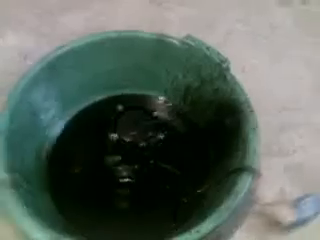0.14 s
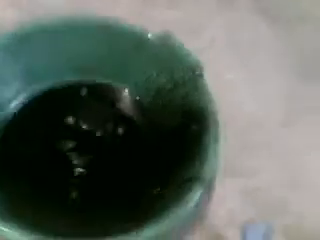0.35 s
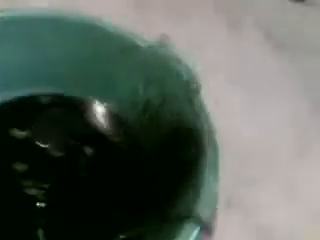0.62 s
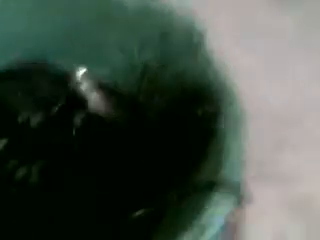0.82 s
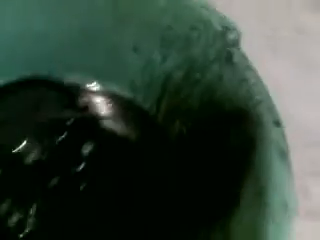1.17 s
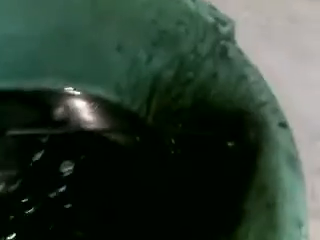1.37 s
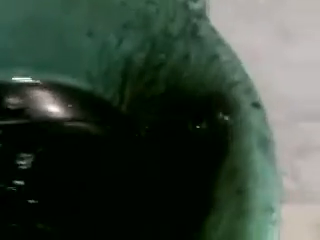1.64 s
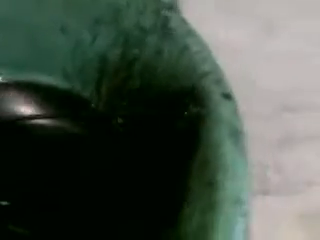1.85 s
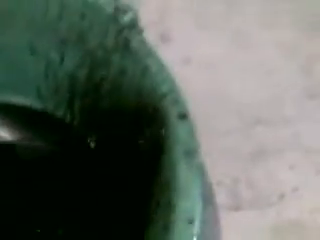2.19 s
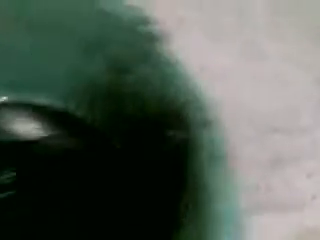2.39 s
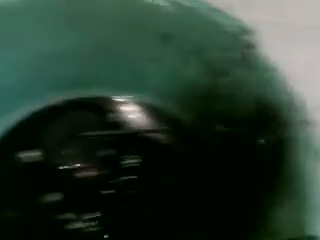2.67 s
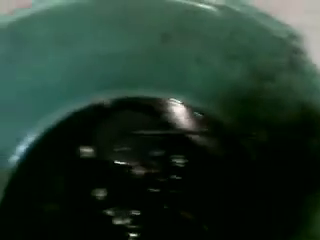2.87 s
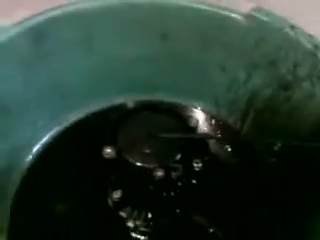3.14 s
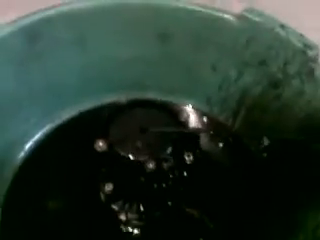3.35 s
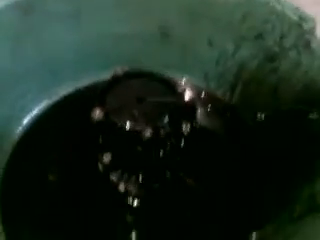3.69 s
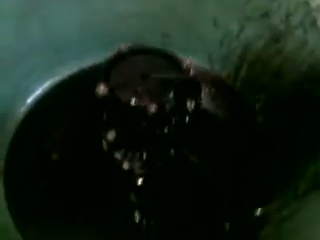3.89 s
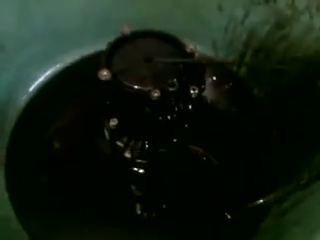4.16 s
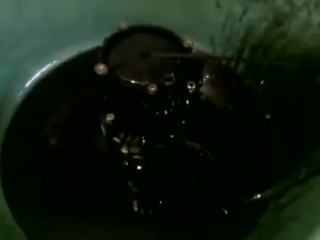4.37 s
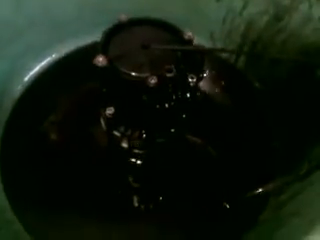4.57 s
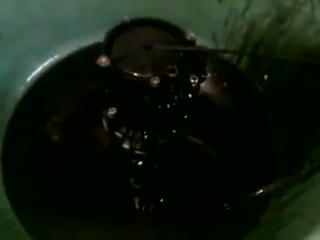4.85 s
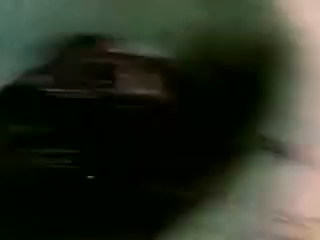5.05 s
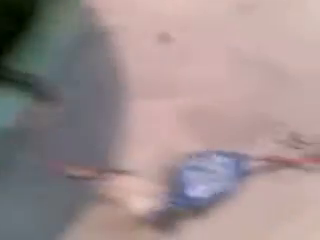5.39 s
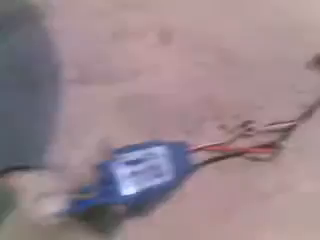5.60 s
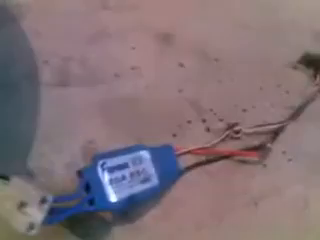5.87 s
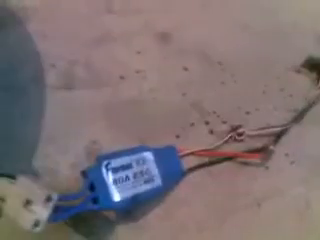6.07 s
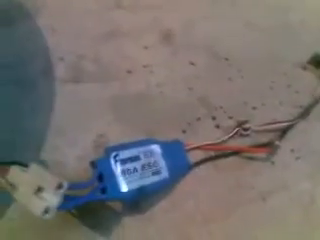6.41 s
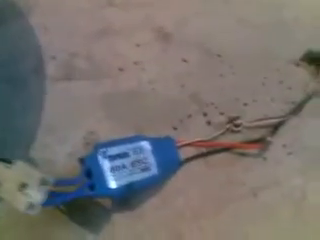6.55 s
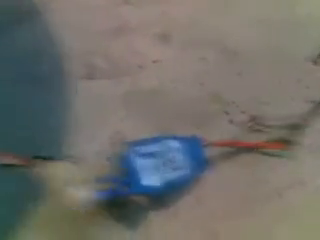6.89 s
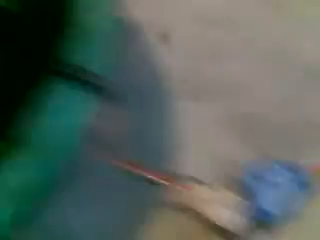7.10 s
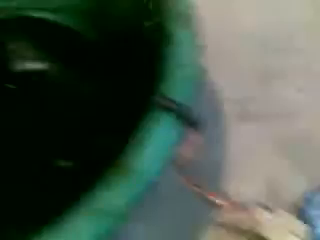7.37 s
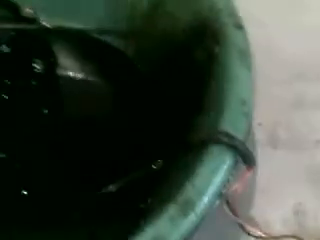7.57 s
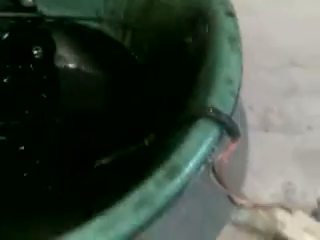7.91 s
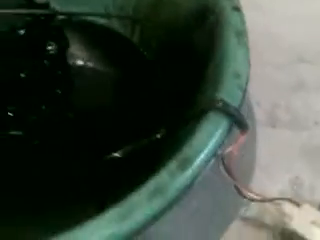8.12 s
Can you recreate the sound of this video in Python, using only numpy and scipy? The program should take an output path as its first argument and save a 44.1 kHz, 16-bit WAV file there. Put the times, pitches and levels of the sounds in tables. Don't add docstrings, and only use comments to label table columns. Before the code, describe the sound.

A small motor submerged in oil buzzes and rattles steadily in a plastic bucket, knocking the wall, with oil spatter and a faint high electronic whine.

```python
import sys
import numpy as np
from scipy import signal
from scipy.fft import rfft, irfft, next_fast_len
from scipy.io import wavfile
from scipy.ndimage import uniform_filter1d, map_coordinates

SR = 44100
rng = np.random.default_rng(int(sys.argv[2]) if len(sys.argv) > 2 else 0)


def voltage_ratio(level):
    return 10 ** (np.asarray(level, float) / 20)


def unload_audio(sound):
    columns = np.transpose(np.atleast_2d(sound))
    steps = np.round(np.clip(columns, -1, 1) * 32767)
    wavfile.write(sys.argv[1], SR, steps.astype(np.int16))


N = 363384

# (t/s, lead/turns)
SHAFT_LEAD = [(0, -.08), (1.4, -.33), (2.9, -.305), (3.7, -.32), (4.75, -.41), (5.5, -.36), (6.25, -.32),
              (6.9, -.18), (8.24, .02)]


def shaft():
    steady_hz = 31.2
    lead = uniform_filter1d(curves(SHAFT_LEAD)[0], size=8000)
    return steady_hz * np.arange(N) / SR + lead


# (angle/turns, length/turns, level/dB)
CONTACTS = [
    (.0, 0.035, -8),
    (0.43, 0.04, -8),
    (0.516, 0.025, -3),
    (0.63, 0.07, -6.5),
]


def rubbing(turns, contact, scatter_db, grit_db):
    force = np.ones(N)
    for angle, length, db in CONTACTS:
        turn = np.round(turns - angle)
        strengths = voltage_ratio(db + scatter_db * rng.standard_normal(N // 1000))
        size = strengths[turn.astype(int) + 2]
        force += contact * size * np.exp(-.5 * ((turns - angle - turn) / length) ** 2)
    return force * voltage_ratio(grit_db * wobble(700)) * rng.standard_normal(N)


# (t/s, peak level/dB)
THUDS = [(0.29, -22), (0.509, -11.5), (0.68, -15), (0.925, -14), (1.066, -15), (1.281, -13), (1.344, -9.5),
         (1.377, -10), (1.41, -16.5), (1.538, -19), (1.602, -10.5), (1.666, -13), (1.794, -10),
         (1.859, -12), (1.954, -11), (2.017, -15), (2.051, -12), (2.083, -11), (2.114, -8.5), (2.153, -15),
         (2.179, -15), (2.295, -17), (2.444, -13), (2.531, -8), (2.595, -13.5), (2.659, -19), (2.71, -20),
         (2.819, -12), (2.947, -14), (3.045, -21), (3.086, -38), (3.203, -11.5), (3.25, -15),
         (3.345, -11.5), (3.459, -27), (3.505, -13.5), (3.632, -10), (3.716, -12), (3.782, -12),
         (3.809, -14), (3.849, -9), (3.943, -12), (4.04, -12), (4.198, -15), (4.44, -13.5), (4.484, -14),
         (4.585, -17), (4.712, -33), (4.885, -11), (4.906, -10), (5.897, -23), (5.93, -17), (6.697, -22),
         (6.778, -15), (7.092, -17), (7.462, -25), (7.601, -17), (7.629, -10), (7.811, -19), (8.067, -16)]
# (t/s, peak level/dB)
MORE_THUDS = [(.195, -18), (.637, -14), (.728, -16), (1.697, -15), (1.914, -21), (2.309, -13), (2.385, -10),
              (2.754, -26), (2.789, -25), (2.99, -17), (3.568, -20), (4.155, -17), (4.759, -14), (4.983, -16),
              (5.037, -14), (5.189, -14), (5.529, -23), (5.675, -28), (6.316, -20), (6.95, -14.5), (7.715, -17),
              (2.415, -11), (2.49, -13), (6.535, -24), (6.635, -15)]


def lifted():
    lift_s, lift_db = 0.0054, -3.5
    press_s, press_db = .008, 2
    t = np.arange(N) / SR
    pushes = np.sort(np.transpose(THUDS + MORE_THUDS)[0])
    halfway = (pushes[1:] + pushes[:-1]) / 2
    nearest = np.clip(np.searchsorted(halfway, t), 0, len(pushes) - 1)
    since = t - pushes[nearest]
    lift = lift_db * np.exp(-.5 * (since / lift_s + 1) ** 2)
    press = press_db * np.exp(-.5 * (since / press_s - 1) ** 2)
    return voltage_ratio(lift + press)


# (f/Hz, width/Hz, level/dB)
WALL = [(713, 63, -3.5), (760.2, 120, 7.5), (953, 77, -7.5)]
RIM_LOW = [(1155, 264, 0.5), (1405, 50, -3.5)]
RIM_HIGH = [(1086, 650, -6), (1268, 138, 2.5)]
HOUSING = [(1639, 176, -0.58), (1770, 196, -0.42)]
BASE = [(402, 98, 0)]
# (far level/dB, over level/dB, beside level/dB, change per aim/dB)
WALL_DB = (-32.5, -31.5, -37, 1.3)
RIM_DB = (-35, -35, -34, 1.4)
HOUSING_DB = (-43, -43.5, -40.5, 2.5)
BASE_DB = (-49, -83, -62, 6)
RIM_HIGH_SHARE = (0.72, 0.31, 0.71, 0.21)


def bucket(turns):
    lift = lifted()
    wall_rub = rubbing(turns - .02, .8, 2.5, .8) * lift * voltage_ratio(0.5 * wobble(17))
    wall = voltage_ratio(heard(WALL_DB) + 0.48) * unit(rung(wall_rub, WALL))

    low_rim = unit(rung(rubbing(turns + .03, 0.9, 4, 2) * lift, RIM_LOW))
    high_rim = unit(rung(rubbing(turns + .03, 0.9, 4, 2) * lift, RIM_HIGH))
    high = np.clip(placed(*RIM_HIGH_SHARE) + 0.13 * wobble(4.5), 0, 1)
    rim = np.sqrt(1 - high) * low_rim + np.sqrt(high) * high_rim
    rim *= voltage_ratio(heard(RIM_DB) + 0.5)

    housing_rub = rubbing(turns + 0.018, 1.3, 3, 2.6)
    housing = voltage_ratio(heard(HOUSING_DB) - 1.5) * unit(rung(housing_rub, HOUSING))
    base = voltage_ratio(heard(BASE_DB)) * unit(rung(rubbing(turns, 0.48, 3, 2.3), BASE))
    pushes = blows(THUDS + MORE_THUDS, t60=0.024, tail=0.067)
    thuds = voltage_ratio(25.5) * rung(pushes, WALL + [(1185, 194, 0.5)])
    return wall + rim + housing + thuds + base


# (t/s, peak level/dB)
KNOCKS = [(0.825, -30.5), (0.8555, -36.5), (1.049, -39), (1.0824, -34), (1.147, -35), (1.3065, -34),
          (1.338, -38), (1.4346, -37), (1.531, -38), (1.5978, -55), (1.6906, -34), (1.729, -29),
          (1.7878, -43), (1.855, -34), (1.8741, -35), (1.9774, -30.5), (2.0797, -32), (2.144, -39),
          (2.1778, -27), (2.2056, -29), (2.2694, -31.5), (2.305, -34), (2.3231, -42), (2.4613, -37),
          (2.4907, -30), (2.556, -29.5), (2.589, -31), (3.9365, -36), (4.58, -35), (4.6743, -35),
          (5.027, -36), (5.378, -37), (5.476, -36), (5.5712, -38), (5.634, -30), (5.6685, -35), (5.7, -34),
          (5.829, -36), (5.8934, -35), (5.9545, -31), (6.0192, -33), (6.0831, -36), (6.1005, -49),
          (6.115, -38), (6.147, -39), (6.181, -48), (6.2432, -34), (6.2796, -26), (6.339, -34),
          (6.5276, -41), (6.559, -28), (6.627, -30), (6.6932, -53), (6.8488, -28.5), (6.8773, -30),
          (6.9094, -28), (7.234, -40), (7.2966, -32), (7.6116, -36), (8.1835, -32)]
# (f/Hz, width/Hz, level/dB)
CAP = [(2000, 840, 5.8), (2610, 1750, 0.5)]
SHIELD = [(3295, 530, 0)]
LID = [(2520, 430, 0)]
RATTLE = [(3340, 700, 0), (4000, 650, -3), (4620, 700, -1.5)]
# (far level/dB, over level/dB, beside level/dB, change per aim/dB)
CAP_DB = (-51.5, -48.5, -51, -3)
SHIELD_DB = (-78, -66.5, -59, 9.5)
LID_DB = (-65, -60, -73.5, -8)
RATTLE_DB = (-55.5, -53.5, -50.5, 1.5)


def bearing(turns):
    push = rubbing(turns + 0.009 + .025 * wobble(45), 2.0, 2, 2.4)
    cap = unit(rung(push + 8 * rng.standard_normal(N), CAP))
    shield = unit(rung(push + 1.6 * rng.standard_normal(N), SHIELD))
    lid = unit(rung(push, LID))
    rattle = unit(rung(push, RATTLE, sign=-1.38))
    knock_modes = [(2310, 3100, -1.1)] + RATTLE + [(6140, 1200, -31.0)]
    knocks = rung(blows(KNOCKS, t60=0.035, tail=0.19), knock_modes, sign=-1.27)
    total = voltage_ratio(heard(CAP_DB) - 2.0) * cap + voltage_ratio(heard(SHIELD_DB)) * shield
    total += voltage_ratio(heard(LID_DB)) * lid + voltage_ratio(heard(RATTLE_DB) - 2.0) * rattle
    return total + voltage_ratio(12.0) * knocks


ORDERS = [*range(2, 20), 29]
# (far level/dB, over level/dB, beside level/dB)
ORDER_LEVELS = [(-72, -69.5, -64.5), (-83, -63, -67.5), (-70, -66, -64.5), (-63, -66, -61.5),
                (-62.5, -60.5, -64.5), (-65, -57.5, -54), (-51, -44.5, -45.5), (-50.5, -47, -44),
                (-57, -63.5, -48.5), (-51.5, -57.5, -54), (-47.5, -59, -57.5), (-58, -66.5, -57),
                (-61, -60.5, -55), (-68, -60.5, -55), (-82, -61.5, -53.5), (-83, -88, -66), (-90, -66, -72),
                (-80, -70, -60), (-44, -45.5, -44.5)]
# (far level/dB, over level/dB, beside level/dB, change per aim/dB)
ORDER_GROUPS_DB = [
    (-74, -65, -64, 5.5),
    (-45, -43, -40, -1),
    (-47, -51, -45.5, 2.5),
]


def hum(turns):
    place, total = curves(CAMERA)[0], np.zeros(N)
    rows = list(zip(ORDERS, ORDER_LEVELS))
    for group, group_db in zip((rows[:2], rows[2:9], rows[9:18]), ORDER_GROUPS_DB):
        tones, power = np.zeros(N), np.zeros(N)
        for order, db in group:
            gain = voltage_ratio(np.interp(place, range(3), db))
            flutter_db = 1.07 * wobble(3) + 1.34 * wobble(18)
            flutter_db += 1.15 * np.cos(np.pi * turns + order / 2)
            if order == 8:
                drift = 0.033 * wobble(8)
            else:
                drift = rng.uniform() + 0.004 * order * wobble(6.3)
            tones += gain * voltage_ratio(flutter_db) * np.cos(2 * np.pi * (order * turns + drift))
            power += gain ** 2 / 2
        total += voltage_ratio(heard(group_db) - 1.0) * tones / np.sqrt(power)
    order, db = rows[-1]
    lone_db = np.interp(place, range(3), db) - 1.3 * place + 4.0 * wobble(14)
    return total + voltage_ratio(lone_db) * np.cos(2 * np.pi * (order * turns + 0.16 * wobble(9.0)))


# (f/Hz, level/dB)
SWIRL = [(15, -59), (25, -24), (171, -11.5), (228, -15), (257, -4.5), (281, 2), (324, -6.5), (410, -11.5),
         (560, -16), (730, -32), (1230, -120)]
# (f/Hz, level/dB)
SPRAY = [(4000, -120), (5000, 12.5), (5600, 0), (6700, -1), (7500, -3.5), (9300, -17), (11000, 3.5),
         (14000, -18), (16000, -120)]
# (far level/dB, over level/dB, beside level/dB, change per aim/dB)
SPRAY_DB = (-66.5, -67.5, -72.5, 2.5)
# (t/s, level/dB)
SPATTER = [(0, -1), (.4, -1), (1.3, -1), (1.9, 0), (2.5, -4), (3.1, 5.5), (3.7, 5.5), (4.6, 2), (5.0, 0),
           (5.7, 4), (6.3, 7), (6.9, -1), (7.4, -0.5), (8.24, 2)]


def oil():
    swirl_db = -50.5 + 1.2 * curves(CAMERA)[0] + 1.0 * wobble(4) + 1.4 * wobble(15)
    swirl = voltage_ratio(swirl_db) * coloured(SWIRL)
    flicker = voltage_ratio(2.0 * wobble(24) + 2.5 * wobble(340))
    spray = unit(flicker * patchy(coloured(SPRAY), depth_db=4.2))
    spray *= voltage_ratio(heard(SPRAY_DB) + curves(SPATTER)[0] + 2)
    return swirl + spray + drops() + splashes()


# (t/s, peak level/dB, f/Hz)
DROPS = [(1.279, -37, 6900), (1.342, -38, 7350), (1.4371, -38, 6800), (1.4718, -36, 6900),
         (1.6944, -35, 6530), (1.73, -30, 5550), (1.7888, -37, 5540), (1.9846, -36, 6050),
         (2.3286, -42, 6980), (2.4234, -37, 6360), (3.1482, -44, 5900), (3.542, -31, 5400),
         (3.544, -36, 7340), (4.6745, -38, 7200), (5.6994, -39, 8000), (1.24, -42, 7800),
         (4.672, -33, 4970), (5.7, -34, 6750), (6.2824, -31.5, 6300), (6.3105, -40, 6500),
         (6.5685, -32, 5010), (7.9219, -35, 5120), (.9782, -48, 5730), (1.2, -46, 7600),
         (1.3084, -44, 7770), (1.6641, -47, 6610), (2.1445, -46, 6890), (3.469, -45, 5920),
         (4.7316, -39, 5610), (5.8282, -41, 5560), (6.296, -33, 6860), (6.325, -41, 6700),
         (6.6588, -40, 5560), (7.7697, -38, 7150), (8.1469, -39, 5810), (8.1813, -36, 5800)]
# (t/s, peak level/dB, f/Hz)
HIGH_DROPS = [(1.17, -50, 10400), (1.2194, -49, 10300), (1.25, -50, 9300), (1.278, -41, 9400),
              (1.33, -51, 9500), (1.79, -46, 9150), (2.4234, -44, 10100), (3.5396, -40, 9150),
              (4.6728, -44, 9600), (5.5832, -50, 10800), (5.6027, -39, 11000), (5.633, -36, 10900),
              (5.698, -39, 10600), (5.8147, -46, 10900), (6.281, -44, 11100), (6.9062, -47, 11300),
              (3.545, -44, 11100), (4.6728, -38, 8650), (7.9222, -49, 10000), (7.922, -40, 11100),
              (7.37, -49, 11000), (7.4, -48, 10000), (8.06, -54, 9800), (3.29, -50, 10600)]


def drops():
    rise_s, t60_s = 0.001, .045
    total, t = np.zeros(N + 5000), np.arange(5000) / SR
    shape = (1 - np.exp(-t / rise_s)) * voltage_ratio(-60 * t / t60_s)
    for events, width_hz in ((DROPS, 1000), (HIGH_DROPS, 550)):
        for s, db, hz in events:
            spread = 1 + width_hz / hz
            band = signal.butter(3, [hz / spread, hz * spread], "band", fs=SR, output="sos")
            burst = unit(signal.sosfilt(band, rng.standard_normal(5000)))
            total[round(s * SR):][:5000] += voltage_ratio(db - 11.5) * shape * burst
    return total[:N]


# (t/s, half length/s, level/dB, f/Hz)
SPLASHES = [
    (1.24, 0.056, -66, 9300),
    (1.3, 0.066, -67, 7500),
    (1.45, .04, -61, 7060),
    (1.72, 0.039, -58, 6100),
    (1.98, .025, -61, 6100),
    (2.2, .05, -58, 5200),
    (2.33, .03, -69, 7000),
    (6.3, 0.044, -55, 6500),
    (6.57, .04, -56.5, 5500),
]


def splashes():
    t, total = np.arange(N) / SR, np.zeros(N)
    grit = voltage_ratio(5 * wobble(250)) * rng.standard_normal(N)
    for s, half, db, hz in SPLASHES:
        part = slice(round((s - 4 * half) * SR), round((s + 4 * half) * SR))
        band = signal.butter(2, [hz / 1.2, hz * 1.13], "band", fs=SR, output="sos")
        swell = np.exp(-.5 * ((t[part] - s) / half) ** 2)
        total[part] += voltage_ratio(db) * swell * unit(signal.sosfilt(band, grit[part]))
    return total


# (f/Hz, level/dB, partner level/dB)
WHINE = [(8177, -77.5, -78.5), (8397, -69.5, -70)]
# (f/Hz, width/Hz, level/dB)
WHINE_HISS = [(7850, 500, 0), (8850, 400, -2)]
# (far level/dB, over level/dB, beside level/dB, change per aim/dB)
WHINE_DB = (-73.5, -74, -69.5, 5.5)


def controller(turns):
    t, total = np.arange(N) / SR, np.zeros(N)
    for hz, low_db, high_db in WHINE:
        phase = hz * t + rng.uniform() + .14 * wobble(9) + .05 * wobble(60)
        beat = turns - .05 + .06 * wobble(12)
        low = voltage_ratio(low_db + 1.0 * wobble(14)) * np.sin(2 * np.pi * phase)
        high = voltage_ratio(high_db + 1.5 * wobble(15)) * np.sin(2 * np.pi * (phase + beat))
        total += voltage_ratio(1.1 * wobble(4.0)) * (low + high)
    total += voltage_ratio(-76.0) * unit(rung(rng.standard_normal(N), WHINE_HISS))
    return np.sqrt(2) * voltage_ratio(heard(WHINE_DB) + 71.0) * total


# (t/s, level/dB, f/Hz,
# length/s)
BUMP = (-3.5, -62, 33, 0.1)


def handling():
    s, db, hz, length = BUMP
    t = np.arange(N) / SR - s
    return voltage_ratio(db) * np.exp(-.5 * (t / length) ** 2) * np.sin(2 * np.pi * hz * t)


# (t/s, place: 0 far, 1 over the bucket, 2 beside it,
# aim: -1 down into the oil, 1 at the wall, nearness level/dB)
CAMERA = [(0, 0.2, -0.82, -1.2), (.35, 0.028, -0.52, 0.73), (.65, 0.52, -0.35, 0.37),
          (1.1, 1.26, -0.61, 0.55), (1.4, 1.08, 0.65, 0.29), (2.15, 1.32, 1, -1.7), (2.5, 0.84, 0.5, -0.22),
          (2.9, 1.07, -0.48, 0.16), (3.65, 0.95, -0.21, -1.1), (4.1, 0.55, -1.05, 0.74),
          (5.1, 1.02, -0.79, 0.38), (5.6, 1.85, 0.46, -0.28), (6.3, 2.06, 0.093, -0.08),
          (7, 1.77, -0.041, 0.55), (7.5, 1.46, -0.53, 1), (8.24, 1.46, -0.29, 0.13)]


def placed(far, over, beside, per_aim):
    place, aim, _ = curves(CAMERA)
    return np.interp(place, range(3), [far, over, beside]) + per_aim * aim


def heard(part_db):
    nearness_db = curves(CAMERA)[2]
    return placed(*part_db) + nearness_db + .8 * wobble(5.9)


def blows(events, t60, tail):
    out, t = np.zeros(N + 900), np.arange(900) / SR
    for s, db in events:
        noise = tail * voltage_ratio(-60 * t / t60) * rng.standard_normal(900)
        out[round(s * SR):][:900] += voltage_ratio(db) * ((t == 0) + noise)
    return out[:N]


def rung(x, modes, sign=1):
    def response(f):
        total = 0
        for k, (hz, width, db) in enumerate(modes):
            resonance = 1j * f * width / (hz * hz - f * f + 1j * f * width)
            total = total + sign ** k * voltage_ratio(db) * resonance ** 2
        return total
    return filtered(x, response)


def filtered(x, response):
    m = next_fast_len(N + SR // 4)
    return irfft(rfft(x, m) * response(np.fft.rfftfreq(m, 1 / SR)), m)[:N]


def coloured(spectrum):
    hz, db = np.transpose(spectrum)
    return unit(filtered(rng.standard_normal(N), lambda f: voltage_ratio(np.interp(np.log(f + 1), np.log(hz), db))))


def patchy(x, depth_db):
    z = signal.stft(x, nperseg=512)[2]
    field = uniform_filter1d(rng.standard_normal(z.shape), size=6, axis=0)
    field = uniform_filter1d(field, size=7, axis=1)
    return signal.istft(z * voltage_ratio(depth_db * unit(field)), nperseg=512)[1][:N]


def unit(x):
    return x / np.sqrt(np.mean(x ** 2) + 1e-20)


def curves(rows):
    s, *cols = np.transpose(rows)
    return [np.interp(np.arange(N) / SR, s, c) for c in cols]


def wobble(rate):
    return map_coordinates(rng.standard_normal(int(N * rate / SR) + 4), [np.arange(N) * rate / SR])


def scene():
    turns = shaft()
    motor = bucket(turns) + bearing(turns) + hum(turns)
    return (motor + oil() + controller(turns) + handling())[None]


def roll_off(x):
    return signal.sosfilt(signal.butter(12, 14290, fs=SR, output="sos"), x)


def record(dry):
    mix = dry / (1 + np.abs(dry / 0.32) ** 3) ** (1 / 3)
    return roll_off(mix)


dry = scene()
out = record(dry)
unload_audio(out)
```